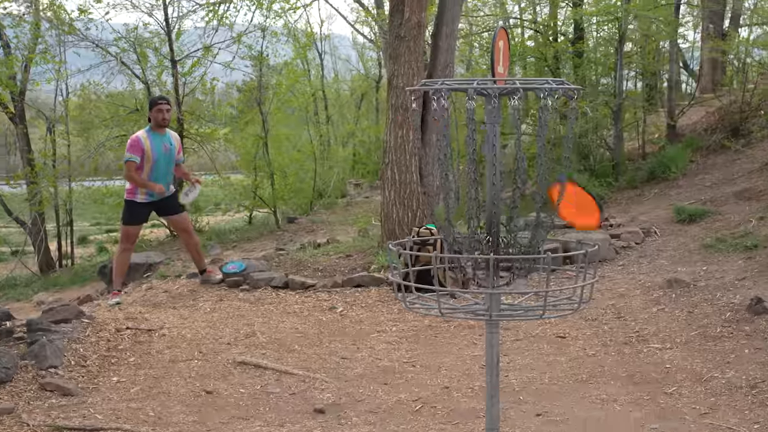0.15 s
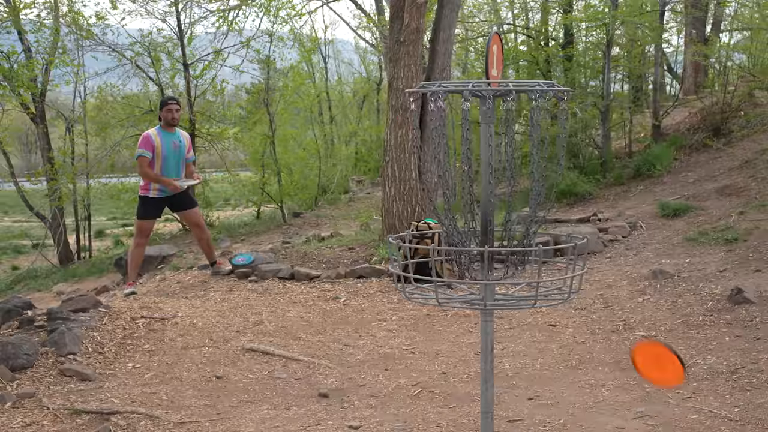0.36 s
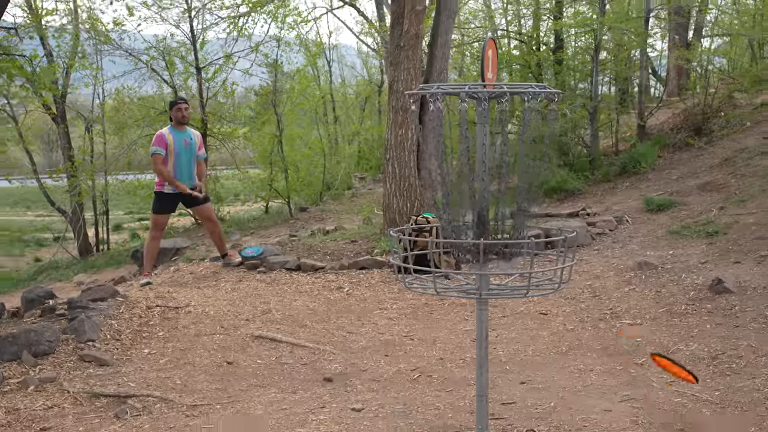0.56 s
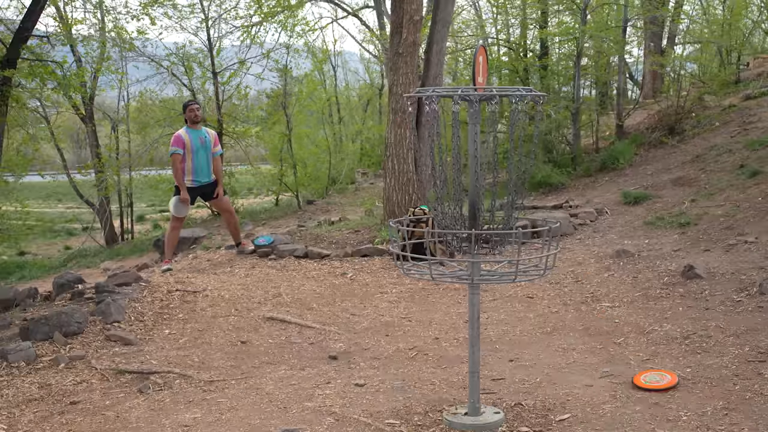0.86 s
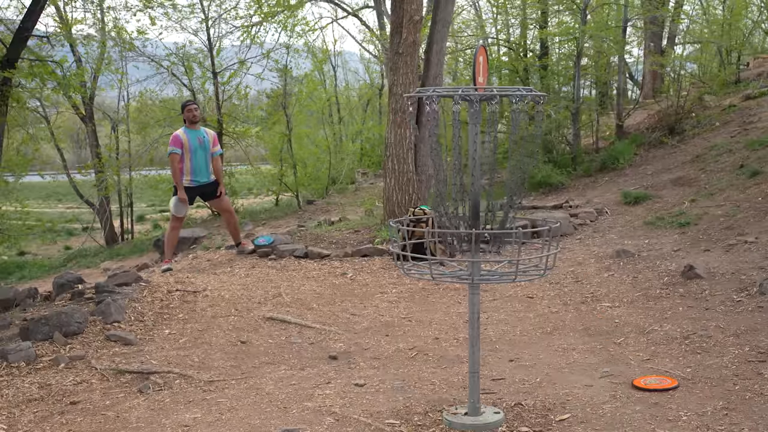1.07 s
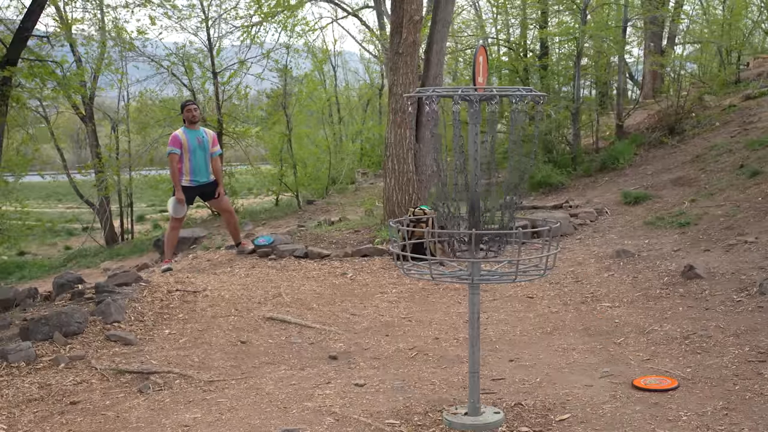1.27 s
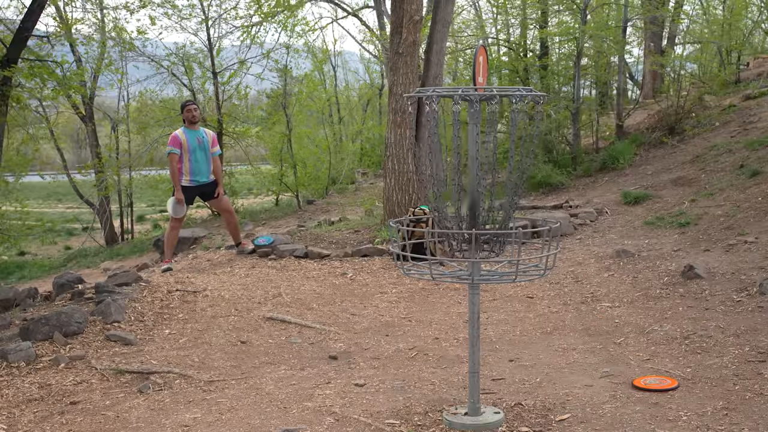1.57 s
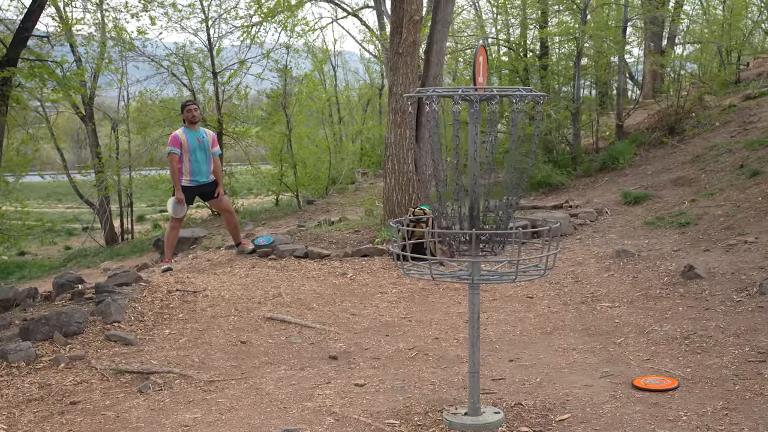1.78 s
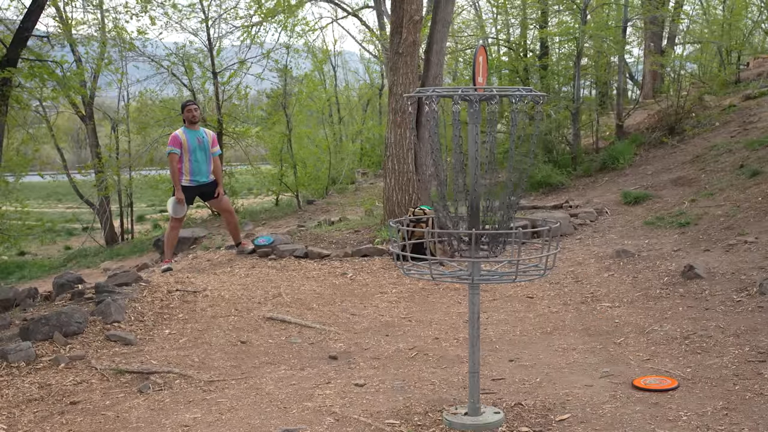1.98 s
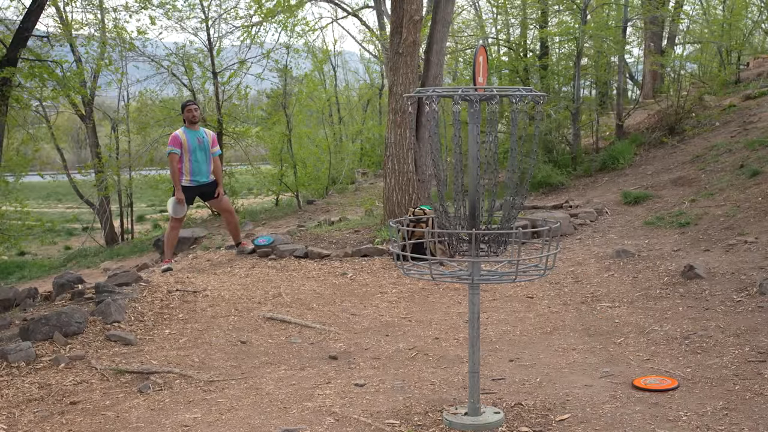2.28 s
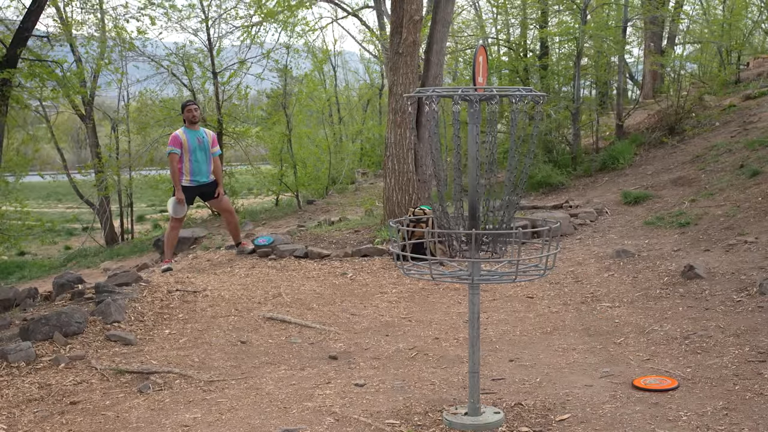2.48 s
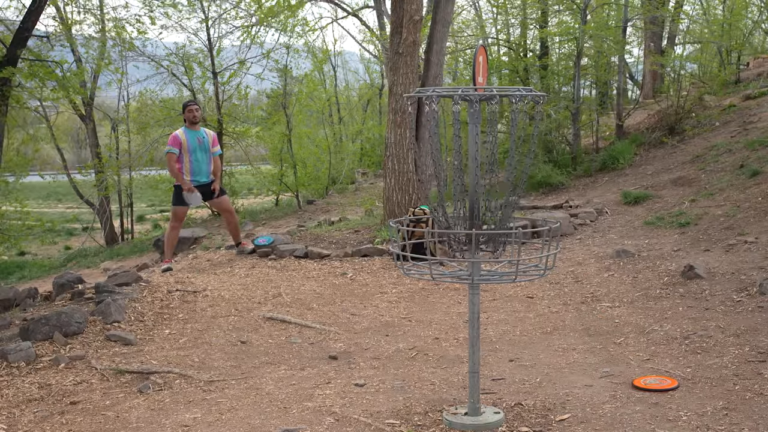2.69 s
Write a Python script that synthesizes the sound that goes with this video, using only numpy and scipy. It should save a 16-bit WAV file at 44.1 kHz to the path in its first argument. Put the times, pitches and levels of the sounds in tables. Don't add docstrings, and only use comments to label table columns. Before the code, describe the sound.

Steel chains on a disc golf basket clash loudly from the start, a heavy ring singing over bright jingling links, with another strong clash at 0.4 s. The disc thuds on dirt near 0.47 s, bounces at 0.84 s and scuffs around 1.1 s. Sparse clinks fade by 2.3 s. Behind are a distant engine dropping then slowly climbing in pitch, road hum, leaves, and faint cricket chirps around 1.8-2.3 s.

```python
import sys
import numpy as np
from scipy import signal
from scipy.fft import rfft, irfft
from scipy.io import wavfile

SR = 44100
rng = np.random.default_rng(int(sys.argv[2]) if len(sys.argv) > 2 else 0)


def voltage_ratio(decibels):
    exponent = np.asarray(decibels, float) / 20
    return 10 ** exponent


def inscribe(sig):
    pcm = np.round(np.clip(np.atleast_2d(sig).T, -1, 1) * 32767)
    wavfile.write(sys.argv[1], SR, pcm.astype(np.int16))


N = 125685
T = np.arange(N) / SR


def rms_one(x):
    return x / np.sqrt(np.mean(x ** 2) + 1e-20)


def in_time(rows):
    s, *columns = np.transpose(rows)
    return [np.interp(T, s, column) for column in columns]


def drift(rate_hz):
    knots = 1.2 * rng.standard_normal(400)
    return np.interp(T * rate_hz * 2, np.arange(400), knots)


def colour(x, points):
    hz, db = np.transpose(points)
    bins_hz = np.arange(N // 2 + 1) * SR / N
    gain = voltage_ratio(np.interp(np.log(bins_hz + 1), np.log(hz), db))
    return irfft(rfft(x) * rms_one(gain), N)


def filtered(x, order, hz, kind):
    return signal.sosfilt(signal.butter(order, hz, kind, fs=SR, output="sos"), x)


def swell(at_s, span_s):
    return np.exp(-((T - at_s) / span_s) ** 2)


def clicks_at(s, db):
    out = np.zeros(N)
    out[np.minimum((np.asarray(s) * SR).astype(int), N - 1)] = voltage_ratio(db)
    return out


def decay_per_sample(t60):
    return voltage_ratio(-60 / (t60 * SR))


def resonate(x, hz, t60):
    r, w = decay_per_sample(t60), 2 * np.pi * hz / SR
    return signal.lfilter([0, np.sin(w)], [1, -2 * r * np.cos(w), r * r], x + 1e-18)


def noise_bursts(clicks, t60):
    envelope = signal.lfilter([1], [1, -decay_per_sample(t60)], np.abs(clicks) + 1e-18)
    return envelope * rng.standard_normal(N)


# (time [s], level [dB])
CHAIN_SWING = [(0, -42), (.18, -52.5), (.27, -57), (.35, -56.5), (.41, -53.5), (.56, -62), (.62, -72),
               (.69, -65), (.86, -73), (.95, -77), (1.06, -68.5), (1.16, -70.5), (1.3, -80), (1.37, -88),
               (1.7, -82.5), (1.74, -80.5), (2.85, -101.5)]
RATTLES_PER_S, RATTLE_SPREAD_DB = 800.0, 3


def rattle():
    draw = rng.random((6000, 2))
    s = np.cumsum(-np.log(draw[:, 0])) / RATTLES_PER_S
    extra_db = RATTLE_SPREAD_DB * np.minimum(-np.log(draw[:, 1]), 3.0)
    db = np.interp(s, *np.transpose(CHAIN_SWING)) + extra_db
    inside = s < T[-1]
    return s[inside], db[inside]


def strike(pitches, modes, s, db, rattle_db, uneven_db, sway_db, lean_db=0):
    out = 0
    contact = signal.windows.hann(int(0.0015 * SR))
    contact_samples = np.arange(len(contact))
    for hz, (mode_db, t60) in zip(pitches, modes):
        blow_db = db + lean_db * np.sign(hz - 13500) + uneven_db * rng.standard_normal(len(s))
        small_s, small_db = rattle()
        clicks = clicks_at(s, blow_db) + clicks_at(small_s, small_db + rattle_db)
        soft = np.cos(2 * np.pi * hz / SR * contact_samples) * contact * 2 / contact.sum()
        rung = resonate(np.convolve(clicks, soft)[:N], hz, t60)
        out = out + voltage_ratio(mode_db + sway_db * drift(45)) * rung
    return out


# (frequency [Hz], density [dB per Hz])
AIR_COLOUR = [(60, -18.5), (130, 1), (250, -4.5), (520, -14.5), (1000, -6), (2000, -14.5), (4500, -33),
              (16000, -46)]
# (time [s], level [dB])
AIR_LEVEL = [
    (0, -48.5),
    (1.35, -54),
    (2.3, -55.5),
    (2.58, -51.5),
    (2.85, -55),
]


def air():
    noise = colour(rng.standard_normal(N), AIR_COLOUR)
    return noise * voltage_ratio(in_time(AIR_LEVEL)[0] + 3 + 1.2 * drift(6.6))


# (time [s], strongest order [Hz], level [dB])
ENGINE = [
    (0, 166, -47.5),
    (.15, 151, -45),
    (.32, 126.4, -49),
    (.52, 122.2, -47.5),
    (1.5, 131, -51.5),
    (2.09, 135.2, -45.5),
    (2.29, 137.5, -53.5),
    (2.55, 140.6, -44),
    (2.85, 144, -51.5),
]
# (multiple of strongest [ratio], level [dB])
ENGINE_ORDERS = [
    (.62, -16),
    (4 / 3, -12.5),
    (5 / 3, -12.5),
    (11 / 6, -16),
    (2.0, -15.5),
]
# (frequency [Hz], level [dB], centre [s], length [s])
DRONES = [
    (152, -47.5, 2.08, 0.26),
    (87, -53.5, 2.53, 0.25),
]


def engine():
    hz, db = in_time(ENGINE)
    turn = 2 * np.pi * np.cumsum(hz) / SR
    out = voltage_ratio(db + 0.4 * drift(5.9)) * np.sin(turn)
    for multiple, order_db in ENGINE_ORDERS:
        level = voltage_ratio(db.mean() + order_db + 3.5 * drift(5.1))
        out = out + level * np.sin(multiple * turn + 1.6 * drift(3.4))
    for drone_hz, drone_db, at_s, span_s in DRONES:
        drone = np.sin(2 * np.pi * drone_hz * T + 3.44)
        out = out + voltage_ratio(drone_db) * swell(at_s, span_s) * drone
    return np.sqrt(2) * out


# (time [s], level [dB])
CHIRPS = [
    (1.8, -79),
    (1.89, -72.5),
    (1.935, -79),
    (1.975, -69),
    (2.03, -76),
    (2.1, -67.5),
    (2.15, -77),
    (2.2, -69),
    (2.27, -80),
    (2.34, -75),
]
CHIRP_HZ, CHIRP_SPAN_S = 4360, 0.024


def cricket():
    shape = sum(voltage_ratio(db) * swell(s, CHIRP_SPAN_S) for s, db in CHIRPS)
    once = resonate(rng.standard_normal(N), CHIRP_HZ, 0.03)
    return shape * rms_one(resonate(once, CHIRP_HZ, 0.03))


# (time [s], peak level [dB])
THUDS = [
    (.02, -33.5),
    (0.4712, -24.5),
    (0.476, -31),
    (0.656, -49),
    (0.7589, -42),
    (0.8367, -26),
    (0.84, -38.5),
    (.859, -33),
    (1.794, -40.5),
]
# (frequency [Hz], level [dB], t60 [s])
DISC_MODES = [(375, -9.5, 0.022), (706, -12.5, 0.038), (1100, -14, 0.01), (1670, 15, 0.007),
              (2550, -30, .015)]
# (centre [s], length [s], level [dB])
SCUFF = (1.1, 0.056, -53)


def disc():
    s, db = np.transpose(THUDS)
    push = -filtered(clicks_at(s, db) + 1e-18, 2, [280, 800], "band")
    body = sum(voltage_ratio(mode_db - 2) * resonate(push, hz, t60) for hz, mode_db, t60 in DISC_MODES)
    at_s, span_s, scuff_db = SCUFF
    scuff = voltage_ratio(scuff_db) * swell(at_s, span_s) * rng.standard_normal(N)
    dirt = noise_bursts(clicks_at(s, db - 8.5), 0.056) + scuff
    return voltage_ratio(23.0) * push + body + filtered(dirt, 2, [400, 4000], "band")


# (time [s], peak level [dB])
WIRE_KNOCKS = [(0.3808, -37.5), (0.9462, -59), (1.0324, -60), (1.065, -56), (1.1218, -50), (1.17, -62),
               (1.211, -56), (1.2628, -60), (1.29, -52.5), (1.5459, -65), (1.714, -53), (1.76, -57.5),
               (1.7982, -58), (1.8595, -65.5), (2.7057, -65.5)]
WIRE_HZ = [5060, 6740, 7311, 7677, 8791, 11100, 11690, 13650]
# (level [dB], t60 [s])
WIRE_MODES = [(-11.5, 0.13), (-14, 0.14), (-28, 0.032), (-21, 0.14), (-13.5, .13), (-13.5, 0.15),
              (-15.5, 0.093), (-9, .16)]
# (time [s], peak level [dB])
POLE_TICKS = [(0.5194, -60), (0.7297, -56), (0.7657, -55), (1.264, -59), (1.4102, -65), (1.5145, -60),
              (1.725, -68), (1.76, -67), (1.7994, -70), (1.82, -78), (1.8841, -61), (1.925, -61.5),
              (2.0258, -65), (2.2877, -68)]
POLE_HZ = [4950, 5190, 5600]
# (level [dB], t60 [s])
POLE_MODES = [(6.5, 0.016), (-0.5, .04), (-1, 0.0215)]


def wires_and_pole():
    twins_hz = list(WIRE_HZ) + [hz * 1.0045 for hz in WIRE_HZ]
    twin_modes = list(WIRE_MODES) + list(WIRE_MODES)
    wires = strike(twins_hz, twin_modes, *np.transpose(WIRE_KNOCKS), rattle_db=-10, uneven_db=2.5, sway_db=5.5)
    pole = strike(POLE_HZ, POLE_MODES, *np.transpose(POLE_TICKS), rattle_db=-10, uneven_db=2.5, sway_db=4.5)
    return wires + pole


def chatter(s, db, lean_db):
    gaps_s = 0.024 * rng.uniform(0.71, 1.3, (len(s), 3))
    rebound_s = s[:, None] + np.cumsum(gaps_s, axis=1)
    rebound_db = db[:, None] - (5.5 * np.arange(1, 4) + 5.5)
    all_s = np.r_[s, rebound_s.ravel()]
    all_db = np.r_[db, rebound_db.ravel()]
    return all_s, all_db, np.r_[lean_db, np.repeat(lean_db, 3)]


# (time [s], peak level [dB], lean to the upper family [dB])
CLASHES = [(.1106, -29, 8), (0.133, -24, 3), (0.17, -32, -2), (0.231, -39, 0), (.295, -32, 0.5),
           (.3486, -28.5, 5), (.401, -22, 3), (0.474, -32, 3.5), (0.5156, -36, 5), (0.565, -46, -7),
           (.594, -44, 6), (.666, -37, 4), (0.6837, -31, 1), (0.7305, -48, 3), (.753, -36.5, -1),
           (0.777, -36, -0.5), (.845, -42, -1), (0.882, -35.5, -1.5), (0.9857, -47, -2), (1.0323, -43, -1),
           (1.0895, -48, -11), (1.109, -40, 3), (1.16, -50, -1), (1.232, -44, -2), (1.2884, -55, 3),
           (1.3965, -58, 0), (1.4108, -47, -3), (1.4414, -50.5, -4), (1.547, -47.5, -2), (1.6337, -54, 4),
           (1.7175, -53, -2), (1.8575, -56, 0), (1.878, -61, -1), (1.9013, -55, -3), (2.0177, -48.5, -2.5),
           (2.0512, -52.5, -1.5), (2.1962, -62, -5), (2.6978, -63, 2)]
# (frequency [Hz], spread between links [Hz])
LINK_HZ = [(12830, 100), (14170, 85), (15350, 100), (12400, 120)]
# (level [dB], t60 [s])
LINK_MODES = [(-10.5, 0.094), (-16.5, 0.104), (-22.5, .06), (-16.5, .04)]


def links():
    s, db, lean_db = chatter(*np.transpose(CLASHES))
    steps = np.linspace(-1.8, 1.8, 9)
    pitches = [hz + width_hz * (k + rng.uniform(-0.2, 0.2)) for hz, width_hz in LINK_HZ for k in steps]
    modes = [(mode_db - 1.9 * k * k, t60) for mode_db, t60 in LINK_MODES for k in steps]
    tick = filtered(noise_bursts(clicks_at(s, db - 11), 0.024), 2, 6000, "high")
    rung = strike(pitches, modes, s, db - 5.0, rattle_db=-6.5, uneven_db=6.5, sway_db=4.5, lean_db=lean_db)
    return rung + tick


# (time [s], level [dB], length [s], detune [Hz])
RING_FREE = [(0.019, -19, 0.012, -0.5), (0.053, -19.5, 0.015, -9.5), (0.079, -18.5, 0.016, 7),
             (0.11, -20, 0.0065, 2.5), (0.14, -23.5, 0.048, -9), (0.186, -30.5, 0.098, 9.5),
             (0.294, -27, 0.029, -7), (0.351, -29, 0.04, 1), (0.402, -23.5, 0.0086, 0),
             (0.425, -26.5, 0.029, -10), (0.471, -30, 0.019, 17), (.508, -34, 0.058, -0.5),
             (0.589, -43, 0.075, -5), (0.666, -32, 0.081, -5), (0.769, -32, 0.052, -4),
             (0.844, -40, 0.085, 4), (0.952, -52.5, 0.3, -1), (1.135, -39, 0.064, 5),
             (1.245, -53, 0.17, -1.5), (1.51, -47, .07, 4), (1.604, -55, 0.076, 0.5),
             (2.285, -53.5, .08, 2.5)]
# (time [s], peak level [dB])
DULL_BLOWS = [
    (.408, -51),
    (.6685, -33),
]
# (time [s], peak level [dB])
TOP_BLOWS = [
    (.024, -46),
    (0.054, -26),
    (0.089, -42),
    (.136, -40),
    (.172, -27.5),
    (.35, -45),
    (.405, -32),
    (.55, -49),
    (.668, -60),
]
FREE_HZ, FREE_T60_S = 2924, 0.6
FREE_EDGE_S, FREE_STOP_S = 0.0036, 0.013


def free_ring():
    out = 0
    for s, db, length, detune in RING_FREE:
        age = T - s
        start = np.clip(age / FREE_EDGE_S, 0, 1)
        caught = np.exp(-(np.maximum(age - length, 0) / FREE_STOP_S) ** 2)
        level = voltage_ratio(db - 60 * np.maximum(age, 0) / FREE_T60_S)
        out = out + level * start * caught * np.sin(2 * np.pi * (FREE_HZ + detune) * T)
    dull = resonate(clicks_at(*np.transpose(DULL_BLOWS)), 2100, 0.09)
    top = resonate(clicks_at(*np.transpose(TOP_BLOWS)), 15561, 0.41)
    return out * voltage_ratio(1.98 * drift(60)) + dull + top * voltage_ratio(1.4 * drift(30))


# (time [s], peak level [dB], overtones [dB], crack [dB])
RING_BLOWS = [(0.0222, -23, -8, -2.5), (0.0563, -20, -11, -18), (0.0818, -25.5, -8, -10),
              (0.1124, -23.5, -3, 0.5), (0.1341, -18.5, -3.5, 0), (0.1747, -21.5, -9.5, -4.5),
              (0.193, -39, -16, -9), (0.224, -30, -12, -13.5), (0.253, -33, -32, -5),
              (0.2961, -31, -7.5, -4), (0.3112, -34, -9, -6), (0.3583, -31, -19, -7.5),
              (0.406, -19.5, -17.5, -5), (0.477, -30, -28, -22), (0.5225, -36.5, -24, -3),
              (0.5524, -33, -20, -11.5), (0.5771, -36, -23, -8), (0.6677, -31, -24, -2),
              (0.701, -54, -25, -13), (0.728, -33.5, -42, -5.5), (0.7723, -35.5, -22.5, -5),
              (0.8512, -40, -32, -10), (1.1432, -35.5, -40, -8.5), (1.516, -42.5, -40, -8),
              (2.2877, -50.5, -35, -24)]
RING_LOW_HZ = [2908, 2948, 2985, 3119, 3148]
# (level [dB], t60 [s])
RING_LOW = [(-12, 0.26), (-9.5, 0.22), (-17, 0.425), (-10.5, 0.099), (-15, 0.23)]
RING_HIGH_HZ = [8128, 8181, 8235, 8331, 15269, 5290, 11654]
# (level [dB], t60 [s])
RING_HIGH = [(-12.5, 0.18), (-2.5, 0.23), (-5.5, .15), (-9.5, .15), (-26, 0.11), (-8.5, 0.073), (-20, .12)]
CLANK_HZ = [2050, 2280, 3200, 3290, 3379, 3528, 3780, 4150]
# (level [dB], t60 [s])
CLANK = [(-15, .06), (-9, 0.035), (3, 0.04), (-4, 0.048), (-5, .06), (-16.5, 0.045), (-20, 0.055),
         (-16.5, 0.053)]
# (frequency [Hz], density [dB per Hz])
CRACK_COLOUR = [(500, -16), (1300, 3.5), (2200, -2.5), (3300, 0.5), (5000, -2), (15000, -20)]
# (frequency [Hz], density [dB per Hz])
WASH_COLOUR = [(500, -38), (1200, 1), (3300, 6.5), (6000, -4), (10000, -1), (15500, -9.5)]


def steel_ring():
    s, db, high_db, crack_db = np.transpose(RING_BLOWS)
    low = strike(RING_LOW_HZ, RING_LOW, s, db, rattle_db=-1.5, uneven_db=4.0, sway_db=0.7)
    high = strike(RING_HIGH_HZ, RING_HIGH, s, db + high_db, rattle_db=-18.5, uneven_db=2.5, sway_db=2.5)
    clank = strike(CLANK_HZ, CLANK, s, db + crack_db, rattle_db=-4.0, uneven_db=3.0, sway_db=3.5)
    crack = colour(noise_bursts(clicks_at(s, db + crack_db - 5.0), 0.045), CRACK_COLOUR)
    wash = voltage_ratio(4.5) * colour(noise_bursts(clicks_at(*rattle()), 0.0078), WASH_COLOUR)
    return low + high + clank + crack + wash


def wood(x):
    t = T[:SR // 2]
    decay = voltage_ratio(-60 * t / 0.31)
    onset = np.minimum(t / 0.0096, 1)
    tail = rng.standard_normal(len(t)) * decay * onset
    tail = tail / np.sqrt(np.sum(tail ** 2))
    return x + voltage_ratio(-8) * signal.oaconvolve(x, tail)[:N]


def scene():
    background = air() + engine() + cricket()
    near = wood(disc() + wires_and_pole() + links() + steel_ring())
    return (background + near + free_ring())[None]


def low_pass(x):
    return signal.sosfilt(signal.butter(12, 16470, fs=SR, output="sos"), x)


def record(dry):
    x = filtered(dry, 6, 76.5, "high")
    x = signal.sosfilt(signal.cheby2(16, 60, 16100, fs=SR, output="sos"), x)
    return low_pass(x)


dry = scene()
out = record(dry)
inscribe(out)
```